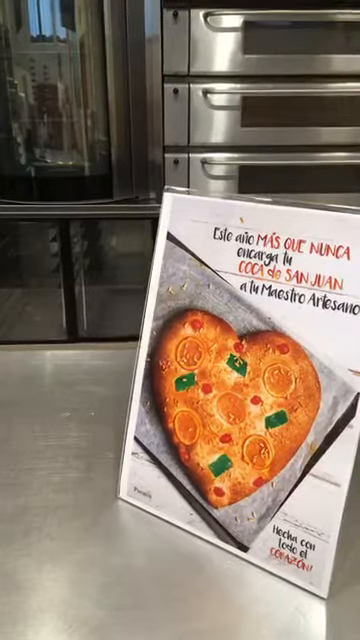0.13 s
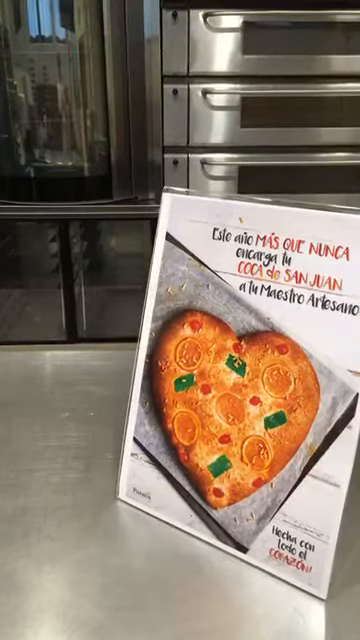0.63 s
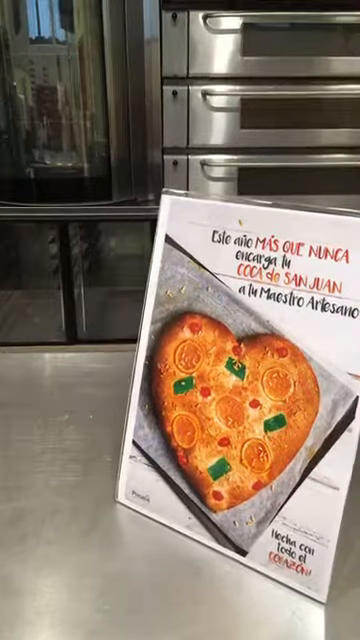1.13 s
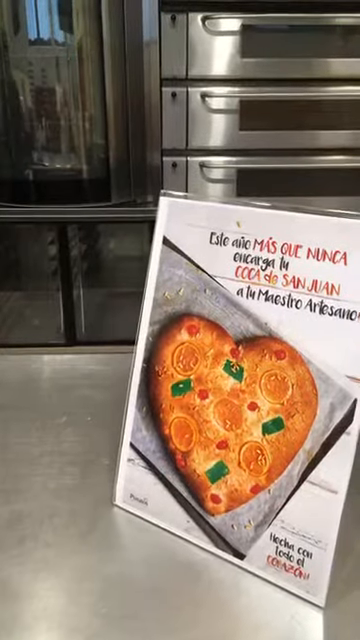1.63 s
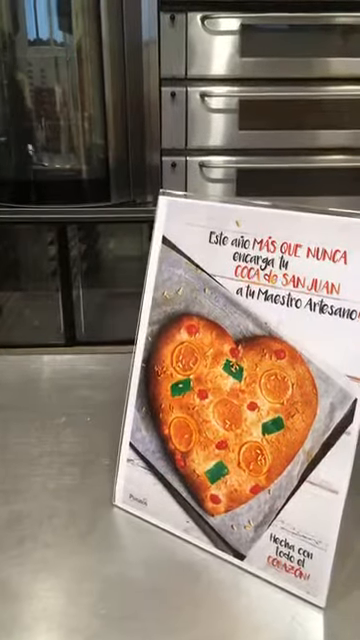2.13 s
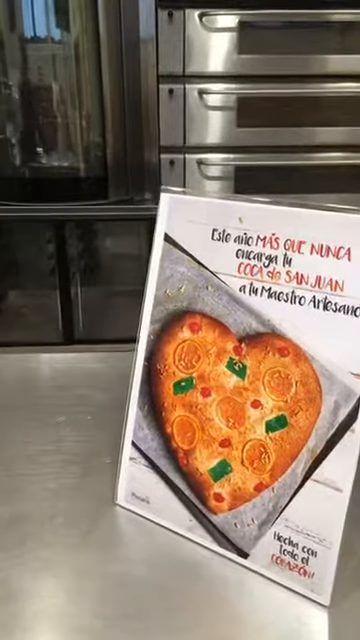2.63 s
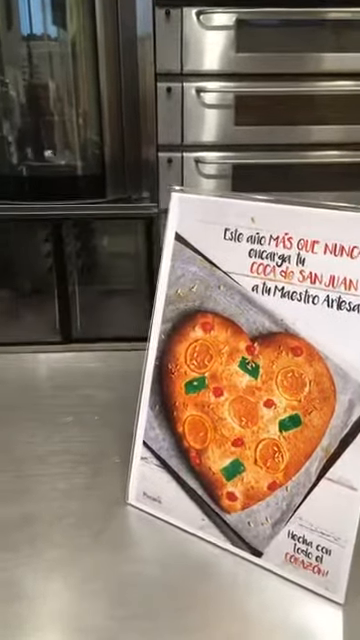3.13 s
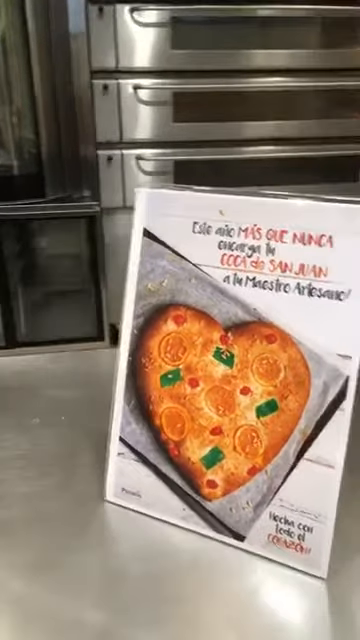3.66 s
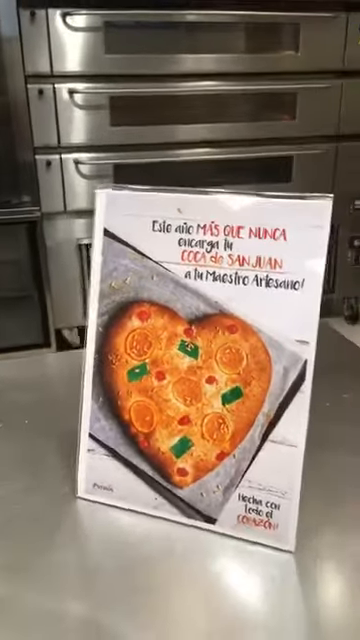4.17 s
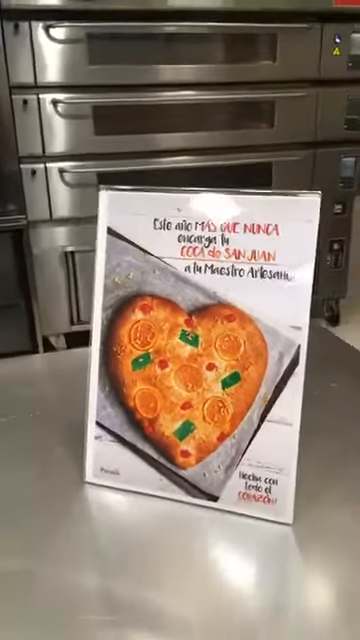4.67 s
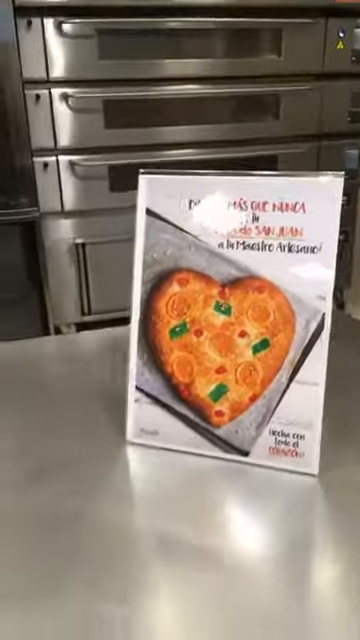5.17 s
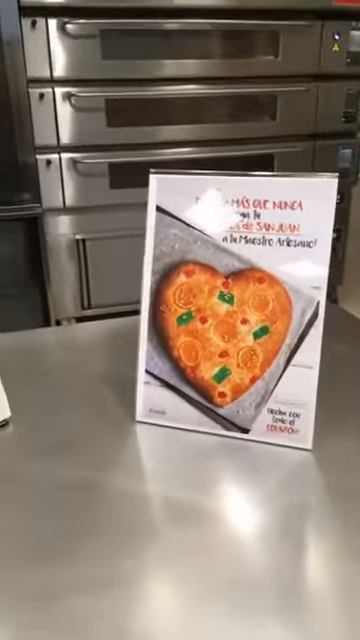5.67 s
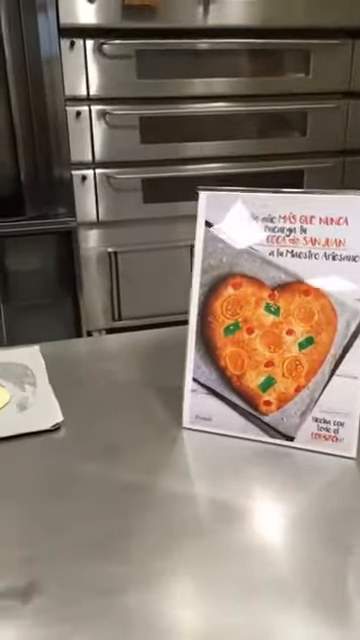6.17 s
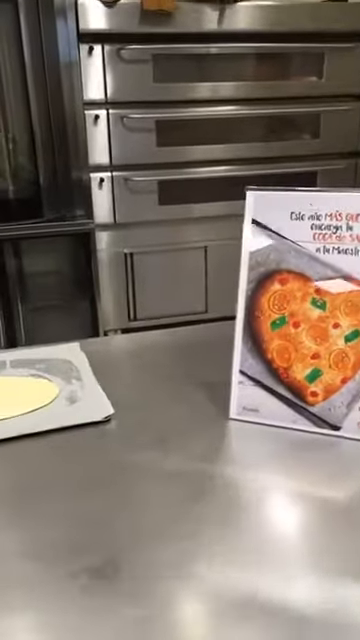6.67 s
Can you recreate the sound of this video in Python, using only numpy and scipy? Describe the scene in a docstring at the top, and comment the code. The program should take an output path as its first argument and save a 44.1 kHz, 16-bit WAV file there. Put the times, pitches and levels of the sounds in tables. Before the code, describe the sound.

In a tiled, steel-filled bakery kitchen with a low cooling hum, shoes and cloth shuffle close to a small handheld microphone. Soon a heavy door slams: a brief rising whistle of squeezed air, latch clack, then a loud rattling boom with bright echoes. Later it shuts again much more gently, a few dry ticks sound, and two lighter hollow knocks echo from further off.

```python
"""A heavy door shuts in a tiled bakery kitchen: noise rattles for latch and frame, damped modes boom for the leaf,
and a rising sine with a rush of noise whistles in the closing gap. It shuts once more, gently; two lighter,
more echoing knocks follow further off, each with a hollow thump of modes. Nearby, shaped noise makes the shuffle
of shoes and cloth, the footfalls and a few ticks, over a noise-and-sine hum of cooling machines."""
import sys
import numpy as np
from scipy import signal
from scipy.fft import rfft, irfft
from scipy.io import wavfile
from scipy.ndimage import uniform_filter1d

SR = 44100
rng = np.random.default_rng(int(sys.argv[2]) if len(sys.argv) > 2 else 0)


def volts(x):
    """Linear amplitude factor 10**(x/20) for a level x in dB, scalar or array-like."""
    e = np.asarray(x, float) / 20
    return 10 ** e


def output_pcm(signal):
    """Save a mono or channel-first signal as 16-bit PCM at the path in sys.argv[1].

    Samples are clipped to [-1, 1] before scaling.
    """
    pcm = np.clip(np.atleast_2d(signal).T, -1, 1) * 32767
    wavfile.write(sys.argv[1], SR, np.round(pcm).astype(np.int16))


N = 299615
T = np.arange(N) / SR


def along(table, hz):
    """Read (Hz, value) points on a log-frequency axis."""
    point_hz, values = np.transpose(table)
    return np.interp(np.log(np.maximum(hz, 1)), np.log(point_hz), values)


def unit(x):
    """Scale to rms 1."""
    return x / np.sqrt(np.mean(x ** 2))


def noise(colour, size=N, rings=(), tilt_db=0, lumps_db=0):
    """Noise of rms 1 coloured by (Hz, dB) points, narrow resonances, a tilt per octave about 1 kHz and chance lumps."""
    hz = np.fft.rfftfreq(size, 1 / SR)
    db = along(colour, hz)
    for ring_hz, width_hz, up_db in rings:
        db = db + up_db / (1 + (2 * (hz - ring_hz) / width_hz) ** 2)
    db = db + tilt_db * np.log2(np.maximum(hz, 20) / 1000)
    db = db + lumps_db * np.interp(hz, np.linspace(0, SR / 2, 500), rng.standard_normal(500))
    return unit(irfft(rfft(rng.standard_normal(size)) * volts(db), size))


def band(centre_hz, width_hz, size=N):
    """Noise of rms 1 through one resonance."""
    hz = np.fft.rfftfreq(size, 1 / SR)
    resonance = 1 / (1 + (2 * (hz - centre_hz) / width_hz) ** 2)
    return unit(irfft(rfft(rng.standard_normal(size)) * resonance, size))


def walk(rate):
    """Random levels held for 1 / rate seconds, smoothed twice into slow slews and scaled to rms 1."""
    hold = int(SR / rate)
    held = np.repeat(rng.standard_normal(N // hold + 1), hold)[:N]
    return unit(uniform_filter1d(uniform_filter1d(held, hold), hold))


def add(out, start_s, x):
    """Mix x into out from start_s."""
    i = int(start_s * SR)
    out[i:i + len(x)] += x[:len(out) - i]


def fade(t, t60):
    """Exponential decay, 60 dB in t60 seconds (2 ms at the least)."""
    return np.exp(-np.log(1000) * t / max(t60, .002))


# How long the kitchen rings at each pitch: pitch_hz [Hz], t60_s [s]
KITCHEN_DECAY = [(60, 1), (250, 0.71), (1000, 0.89), (2000, 0.83), (4000, 0.77), (8000, 0.65), (14000, 0.4)]


def echoes(colour, rings=(), build_s=0.0056):
    """Dense echoes off tiles and steel after one click: they build up, then each half octave dies at its own rate."""
    t = T[:SR]
    spectrum = rfft(noise(colour, size=len(t), rings=rings, lumps_db=2.5))
    octaves = np.log2(np.maximum(np.fft.rfftfreq(len(t), 1 / SR), 1) / 45)  # octaves above 45 Hz
    tail = 0
    for k in np.arange(0, 9, .5):
        t60 = along(KITCHEN_DECAY, 45 * 2 ** k)
        share = np.clip(1 - 2 * abs(octaves - k), 0, 1)  # overlapping half-octave triangles
        tail = tail + irfft(spectrum * share, len(t)) * fade(t, t60) / np.sqrt(t60)
    return unit(tail * (1 - np.exp(-t / build_s)))


def kitchen(x):
    """The room's answer to a sound: convolution with a flat-coloured echo tail of unit energy."""
    tail = echoes([(20, 0), (20000, 0)])
    return signal.fftconvolve(x, tail / np.sqrt(len(tail)))[:N]


# Colour of the broad fan noise: pitch_hz [Hz], density_db [dB per Hz, relative]
FAN_COLOUR = [(12, -59.5), (20, -16), (47, -3.5), (101, -4), (126, -7.5), (208, -14.5), (428, -16),
              (465, -28), (520, -22.5), (727, -23), (1930, -32), (2480, -29.5), (5110, -36.5),
              (8670, -36.5), (15600, -45)]
# Wavering bands of motor hum: pitch_hz [Hz], width_hz [Hz], level_db [dB rms, middle of the waver]
MOTOR_BANDS = [(60.2, 13, -64.5), (100.5, 13.6, -65.5), (199.5, 11, -75.5), (300, 11, -78)]
# Partials of the thin fan whine: multiple [of 107 Hz], level_db [dB rms]
WHINE_PARTIALS = [(6, -82.5), (7, -83.5), (8, -82.5)]


def machines():
    """Broad fan noise, wavering narrow bands of motor hum, a mains sine that drifts in level and a steady thin whine."""
    fan_db, mains_hz, mains_db, whine_hz = -61, 101, -64.5, 107
    hum = sum(volts(level_db + 1.5 * walk(6)) * band(pitch_hz, width_hz)
              for pitch_hz, width_hz, level_db in MOTOR_BANDS)
    mains = volts(mains_db + 2.9 * walk(3.81)) * np.sqrt(2) * np.sin(2 * np.pi * mains_hz * T)
    whine = sum(volts(level_db) * np.sqrt(2) * np.sin(2 * np.pi * multiple * whine_hz * T)
                for multiple, level_db in WHINE_PARTIALS)
    fan = volts(fan_db + .7 * walk(3)) * noise(FAN_COLOUR)
    return fan + hum + mains + whine


# Scuffs of sole and cloth: start_s [s, full strength], hold_s [s], scrape_db [dB before the grain],
# swish_db and hiss_db [dB against the scrape]
SCUFF_MOVES = [(0.02, .03, -73.5, -20, -20), (0.06, .16, -87, 9.5, 3), (0.285, 0.028, -64.5, -8, -21),
               (0.77, 0.098, -63.5, -6.5, -17), (1.83, 0.047, -61.5, 7.5, 1),
               (1.911, 0.049, -59, 6.5, -1.5), (2.1, .18, -67.5, 3.5, -5), (2.62, 0.072, -71, -2, -9),
               (2.875, 0.022, -67, 4.5, -4), (3.22, 0.16, -71, 2.5, -3.5), (3.39, .22, -69.5, -1, -0.5),
               (3.655, 0.018, -67, 1.5, -6), (3.76, .2, -71, 0.5, -2), (4.27, 0.047, -72, 8.5, 2),
               (4.4, 0.1, -71.5, 2, -2), (4.65, .04, -70.5, 1.5, -5), (4.8, 0.064, -71.5, -6, -15),
               (5.0, .3, -78.5, -13, -22), (5.8, .3, -73, -1, 0), (6.15, .25, -75.5, -0.5, 1.5),
               (6.44, 0.051, -73, -1.5, -2)]
# Low rubbing of soles: time_s [s], level_db [dB before waver and grain]
SOLE_RUB = [(0, -83), (.6, -79), (.87, -72), (1.08, -86), (1.19, -71), (1.75, -54), (1.93, -63.5),
            (2.1, -68.5), (2.3, -65.5), (2.9, -68.5), (3.1, -68.5), (3.66, -60), (4.3, -69), (4.86, -61.5),
            (5.25, -66.5), (5.5, -73.5), (5.93, -60.5), (6.55, -69)]


def shuffle():
    """Soles rub throughout; each scuff swells fast and dies slower as scrape, swish and hiss; all slightly grainy."""
    rise_db_per_s, fall_db_per_s = 201, 96
    rub = [(120, -1), (250, 0.5), (700, -10.0), (1800, -12.5), (3000, -29)]
    scrape = [(1000, -25), (2200, -2.5), (3800, -2.5), (5500, -7.5), (8000, -25)]
    swish = [(3500, -25.0), (5500, -3), (6800, -0.5), (9500, -1.5), (10500, -12.0), (13000, -33)]
    hiss = [(8500, -15), (10600, -5.0), (12500, -1), (14500, -12), (16000, -22)]
    start_s, hold_s, scrape_db, swish_db, hiss_db = np.array(SCUFF_MOVES).T[:, :, None]
    rise_db = rise_db_per_s * np.maximum(start_s - T, 0)
    fall_db = fall_db_per_s * np.maximum(T - start_s - hold_s, 0)
    power = volts(2 * (scrape_db - rise_db - fall_db))  # one row per scuff
    out = noise(rub) * volts(np.interp(T, *np.transpose(SOLE_RUB)) + 1.2 * walk(12))
    for colour, up_db in ((scrape, 0 * scrape_db), (swish, swish_db), (hiss, hiss_db)):
        strength = np.sqrt(volts(2 * up_db[:, 0]) @ power)  # overlapping scuffs add in power
        out = out + noise(colour) * strength
    grain = volts(0.94 * walk(60))
    return out * grain


# Small dry ticks: start_s [s], level_db [dB at the onset]
TICK_HITS = [(3.655, -61), (4.082, -48), (4.6, -56.5), (4.648, -68), (4.8, -61)]


def ticks():
    """Tiny broad clicks: noise that starts at once and dies within hundredths of a second."""
    out, t = np.zeros(N), T[:2048]
    for start_s, level_db in TICK_HITS:
        click = noise([(500, -20), (2000, 1), (8000, -4), (14000, -22)], size=len(t))
        add(out, start_s, volts(level_db) * click * fade(t, 0.032))
    return out


# Soft footfalls: start_s [s], level_db [dB before the envelope], top_hz [Hz, where the dullness sets in]
FOOTFALLS = [(0.211, -50.5, 610), (0.726, -57.5, 840), (0.881, -57, 400), (2.778, -54.5, 300),
             (2.89, -55, 1050), (3.369, -56, 520), (3.65, -57.5, 2200), (4.338, -49.5, 335),
             (5.101, -55, 724)]


def steps():
    """Soft soles: dull puffs of noise with a rounded start."""
    out, t = np.zeros(N), T[:8192]
    for start_s, level_db, top_hz in FOOTFALLS:
        colour = [(90, -30), (200, 0), (top_hz, -4), (3 * top_hz, -30), (9 * top_hz, -55)]
        shape = (1 - np.exp(-t / 0.0049)) * fade(t, 0.22)
        add(out, start_s, volts(level_db) * noise(colour, size=len(t)) * shape)
    return out


def boom(modes, blows):
    """Each blow pushes damped modes; a longer push favours the lows, and those under 140 Hz swell in late."""
    out, t = np.zeros(N), T[:SR]
    rings = np.array([volts(level_db) * np.sin(2 * np.pi * pitch_hz * t) * fade(t, t60_s)
                      for pitch_hz, level_db, t60_s in modes])
    low = np.array(modes)[:, 0] < 140
    lows = rings[low].sum(axis=0) * (1 - np.exp(-t / 0.015))
    highs = rings[~low].sum(axis=0)
    for start_s, boom_db, contact_ms, low_db in blows:
        push = np.sin(np.pi * np.clip(t[:512] * 1000 / contact_ms, 0, 1))  # half-sine contact
        struck = signal.fftconvolve(highs + volts(low_db) * lows, push / push.sum())
        add(out, start_s, volts(boom_db) * struck)
    return out


# Modes of the hollow thump: pitch_hz [Hz], level_db [dB, relative], t60_s [s]
HOLLOW_MODES = [(74, -10, 0.3), (109, -20, 0.26), (120, 2, 0.53), (151.6, -3, 0.52), (164, 4, 0.2),
                (184.5, 2, 0.36), (195.3, 2, 0.53), (276, -5, 0.53), (320, -5, 0.26), (346, -9, .2)]
# Its blows: start_s [s], boom_db [dB on the modes], contact_ms [ms], low_db [dB on modes under 140 Hz]
HOLLOW_BLOWS = [(5.560, -52, 1.7, 0), (6.576, -48, 2.3, -12), (6.608, -48, 2.5, -6)]


def thump():
    """The hollow thump under the knocks: blows ring a small set of low modes."""
    return boom(HOLLOW_MODES, HOLLOW_BLOWS)


# Air squeezed through the closing gap: start_s [s], shut_s [s], first_hz [Hz], last_hz [Hz, approached],
# level_db [dB, peak of the tone before its flutter]
GAP_WHISTLES = [(1.198, 1.264, 1115, 1416, -54), (3.927, 3.968, 1080, 1173, -65)]


def whistle():
    """An unsteady edge tone that rises as the gap narrows, with the rush of the air."""
    glide_s, edge_s = .011, .005  # time constant of the rise; length of each fade
    out = 0
    rush = noise([(300, 4), (1300, -1), (2500, -15), (7000, -7), (11000, -14)])
    for start_s, shut_s, first_hz, last_hz, level_db in GAP_WHISTLES:
        glide = last_hz + (first_hz - last_hz) * np.exp(-np.maximum(T - start_s, 0) / glide_s)
        pitch = glide * (1 + .04 * walk(400))
        gate = np.clip(np.minimum(T - start_s, shut_s - T) / edge_s + .5, 0, 1)
        gain = gate * volts(level_db + 2.5 * walk(150))
        tone = np.sin(2 * np.pi * np.cumsum(pitch) / SR)
        out = out + gain * (tone + volts(-6) * rush)
    return out


# Every rattling blow: start_s [s], thing [0 latch, 1 slam, 2 gentle shutting, 3 bright knock, 4 dull knock],
# level_db [dB before the envelope], tilt_db [dB per octave], t60_s [s]
RATTLE_BLOWS = [(1.261, 0, -20, -1.1, 0.16), (1.308, 1, -20.5, 1.5, 0.085), (1.328, 1, -17.5, -0.5, 0.065),
                (3.932, 2, -53, 1, 0.06), (3.946, 2, -52, -2, .05), (3.959, 2, -45.5, 8, .09),
                (3.972, 2, -26.5, 2, 0.028), (4.005, 2, -32.5, 0.5, 0.029), (4.021, 2, -39, -1, 0.027),
                (5.551, 3, -40, 2.5, 0.052), (5.560, 3, -38, 2.5, 0.068), (5.576, 3, -47, 0, 0.034),
                (6.566, 4, -44.5, 0, 0.062), (6.576, 4, -38.5, 1.5, 0.04), (6.610, 4, -42, 3, 0.093)]
# Colour of each thing, one list apiece: pitch_hz [Hz], density_db [dB per Hz, relative]
RATTLE_COLOURS = [
    [(88, -23), (150, 2.5), (279, -3.5), (682, -24), (1070, -13), (1370, -12.5), (2230, -13.5),
     (2510, -23.5), (4070, -28), (5240, -35), (7300, -24), (15600, -44)],
    [(88, -38), (150, -4), (381, -9), (412, -9), (1070, -14), (1220, -20.5), (1510, -18), (1730, -20.5),
     (3770, -24.5), (4400, -29.5), (9210, -33.5), (15600, -46.5)],
    [(88, -17), (150, -4.5), (302, -9), (437, -15), (573, -10.5), (709, -12.5), (1130, -11), (2060, -18),
     (2320, -18.5), (8200, -28.5), (13100, -49), (15600, -61)],
    [(47, -39), (80, -9), (189, -4), (321, -11), (366, -18.5), (679, -16.5), (758, -26), (1230, -11.5),
     (1350, -18.5), (2980, -17.5), (5900, -21), (6880, -16), (15600, -35)],
    [(47, -43), (80, -28), (162, -11.5), (231, -20), (275, -9.5), (409, -14.5), (545, -12), (793, -21),
     (885, -18), (2390, -19), (3960, -23), (7850, -25.5), (15600, -45.5)],
]
# Narrow resonances of each thing, one list apiece: pitch_hz [Hz], width_hz [Hz], up_db [dB above the colour]
RATTLE_RINGS = [
    [(940, 49, 1.5), (1380, 120, 8), (1800, 74, 1), (2100, 140, 1)],
    [(582, 46, 5.5), (960, 36, 6), (1050, 55, 0), (1524, 68, 12), (2750, 150, 6), (3800, 110, -4),
     (6600, 460, 11.5), (9170, 840, 12)],
    [(565, 22, 8), (950, 31, 0), (1105, 54, 11.5), (1740, 60, -4), (2330, 130, 10), (2670, 100, 10),
     (3590, 510, 10), (4530, 130, 2)],
    [(312, 29, 10.5), (995, 26, 17), (1280, 28, -6), (1680, 420, 13), (2940, 87, 9), (3180, 80, 6),
     (6800, 220, 1), (8100, 400, 7)],
    [(168, 28, 21), (280, 23, 3), (530, 26, -5), (720, 30, 15), (1780, 80, 12), (2850, 90, 6),
     (3273, 97, 10), (4000, 400, 12)],
]
# Echo of each thing, further off is wetter: echo_db [dB against the blow, before scaling by root t60_s]
RATTLE_ECHO = [-13, -10.5, -9, -4, -2.5]


def clatter():
    """Latch, frame and knocked things rattle unevenly; each blow stirs echoes in step with its energy."""
    ring_share = .6  # share of each resonance's dB height left in the echoes
    out, t = np.zeros(N), T[:8192]
    for start_s, thing, level_db, tilt_db, t60_s in RATTLE_BLOWS:
        colour, rings = RATTLE_COLOURS[thing], RATTLE_RINGS[thing]
        shape = (1 - np.exp(-t / (0.036 * t60_s))) * fade(t, t60_s)  # longer rattles start softer
        shape = shape * volts(2.5 * walk(250)[:len(t)])
        rattle = noise(colour, size=len(t), rings=rings, tilt_db=tilt_db)
        add(out, start_s, volts(level_db) * rattle * shape)
        blurred = [(pitch_hz, width_hz, ring_share * up_db) for pitch_hz, width_hz, up_db in rings]
        echo_gain = volts(level_db + RATTLE_ECHO[thing]) * np.sqrt(t60_s)
        add(out, start_s, echo_gain * echoes(colour, blurred))
    return out


# Modes of leaf, frame and the air behind: pitch_hz [Hz], level_db [dB, relative], t60_s [s]
LEAF_MODES = [(40.8, -13.5, 1.23), (56.3, 0, 0.54), (64.2, -1, 0.35), (71.8, -9, 1.17), (90.1, -0.5, 0.4),
              (102.6, -20.5, 1.4), (104, -23.5, 1.5), (115.8, 8.5, 0.17), (127.6, 1, 0.098),
              (148, -9.5, 0.43), (180, -5.5, 0.13), (198.4, -14.5, 0.96), (211, -3, 0.09),
              (259.4, -25, 0.25), (269, -15.5, 0.19), (340, -30, 0.2), (421, -16, 0.21), (566, -7.5, 0.24),
              (994, -2, 0.24), (1120, -13, .2), (1370, -14, .12), (1550, -17, .12), (1990, -19, .1)]
# Blows on the leaf: start_s [s], boom_db [dB on the modes], contact_ms [ms], low_db [dB on modes under 140 Hz]
LEAF_BLOWS = [(1.263, -30, 0.9, -21), (1.310, -16.5, 2.3, -10), (1.328, -15.5, 1.83, 1.5),
              (1.338, -22.5, 2.3, -13), (3.973, -42, 2.1, 4.5), (4.001, -44.5, 6.8, 12)]


def door():
    """The heavy leaf bangs into its frame: blows ring the modes of leaf, frame and the air behind."""
    return boom(LEAF_MODES, LEAF_BLOWS)


def scene():
    """Every source direct, plus the kitchen's answer to the footfalls, the whistle and the booming bodies."""
    body, step, gap = door() + thump(), steps(), whistle()
    wet = kitchen(volts(-6.5) * step + volts(-8) * gap + volts(-13) * body)
    return (body + step + gap + wet + clatter() + ticks() + shuffle() + machines())[None]


def roll_off(x):
    """The treble ends steeply here."""
    return signal.sosfilt(signal.butter(12, 15710, fs=SR, output="sos"), x)


def record(dry):
    """A small microphone loses the deepest bass and rounds the loudest peaks; a steep low-pass sits at 15.7 kHz."""
    dry = signal.sosfilt(signal.butter(2, 35, "high", fs=SR, output="sos"), dry)
    dry = signal.sosfilt(signal.ellip(8, .2, 60, 15700, fs=SR, output="sos"), dry)
    dry = .6 * np.tanh(dry / .6)
    return roll_off(dry)


dry = scene()
out = record(dry)
output_pcm(out)
```